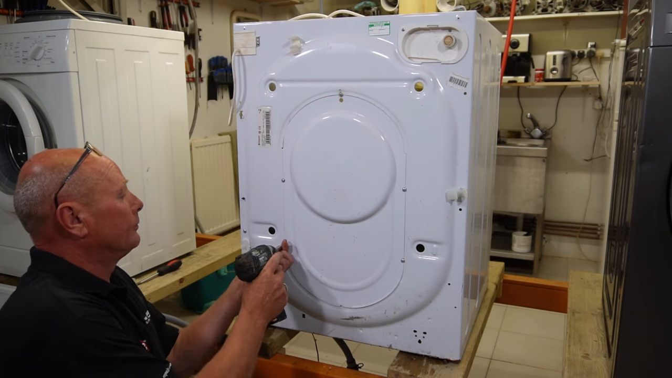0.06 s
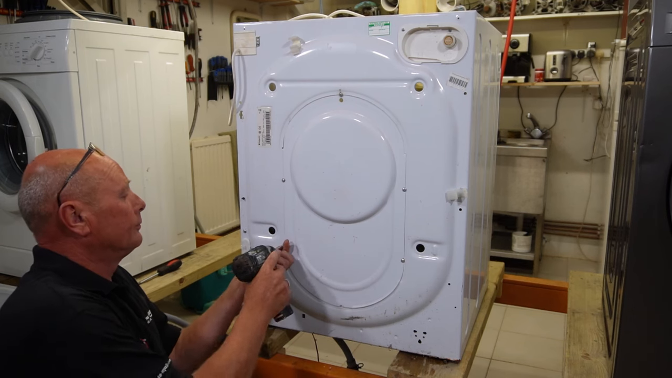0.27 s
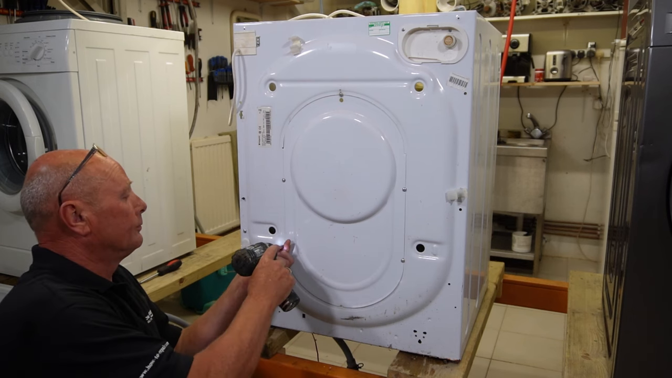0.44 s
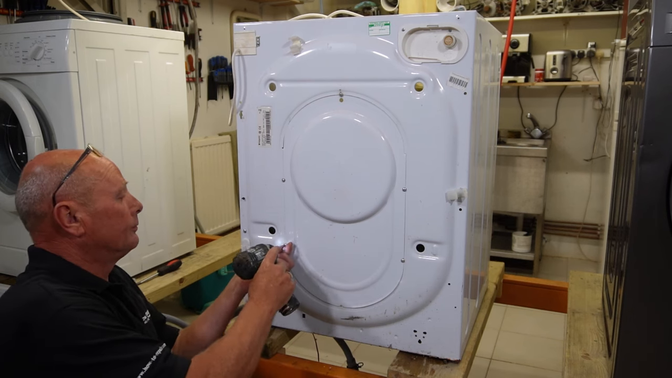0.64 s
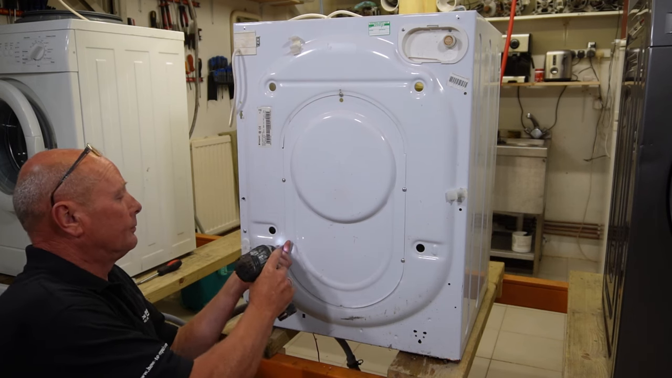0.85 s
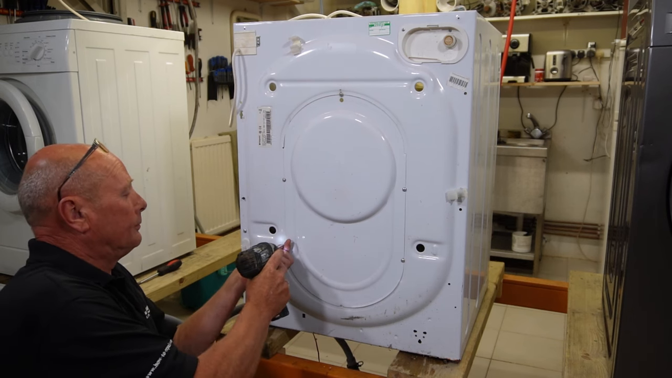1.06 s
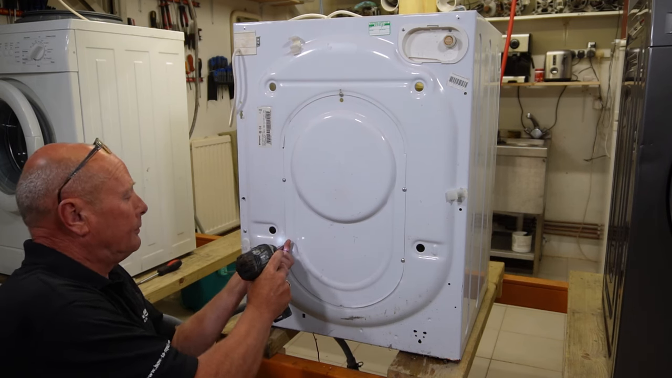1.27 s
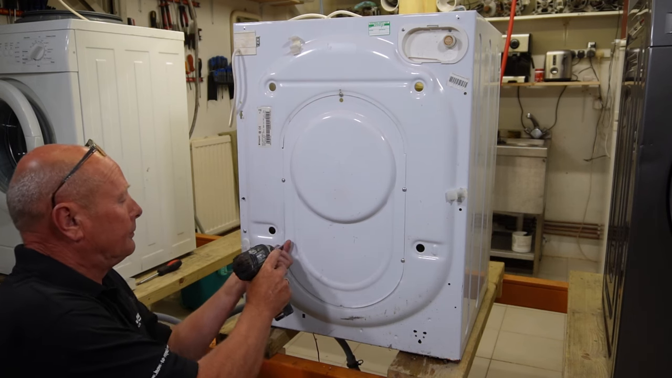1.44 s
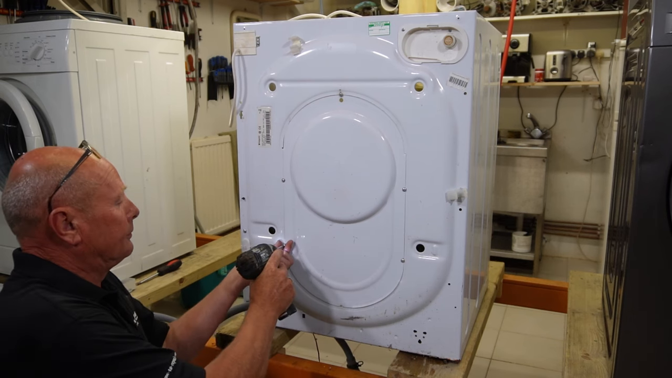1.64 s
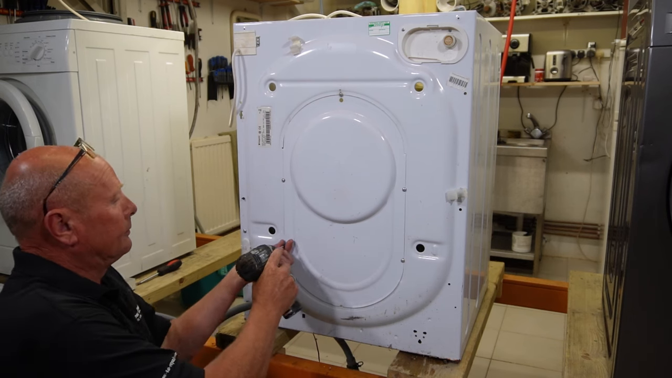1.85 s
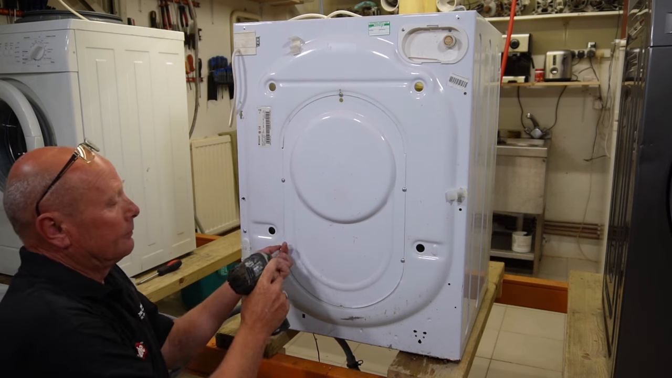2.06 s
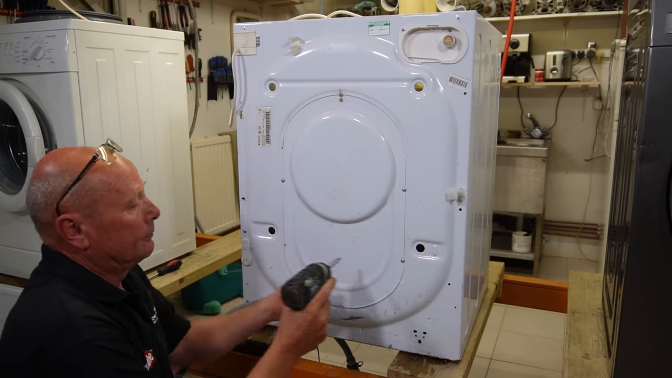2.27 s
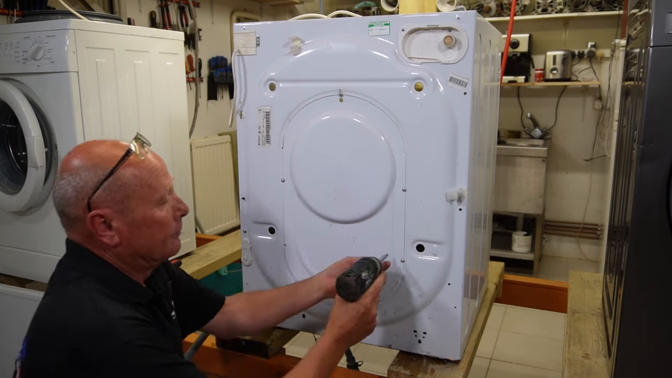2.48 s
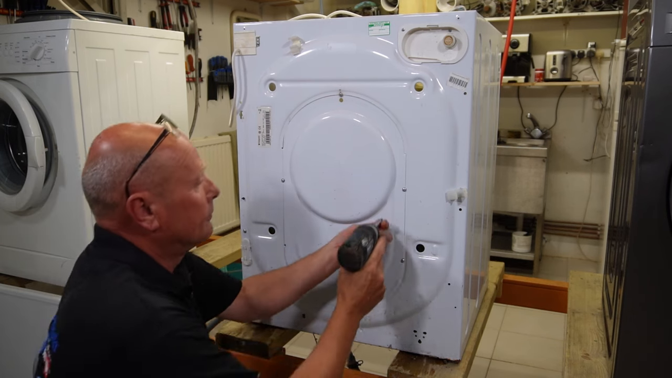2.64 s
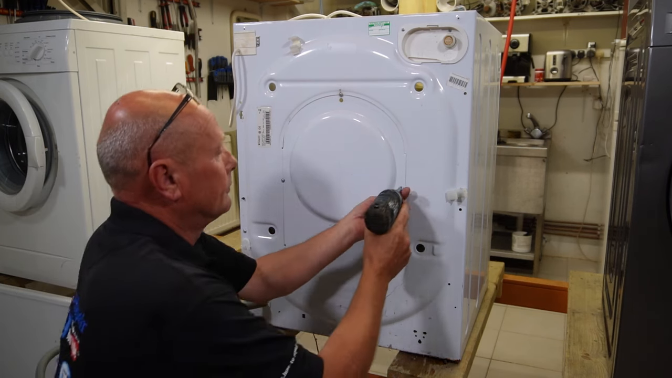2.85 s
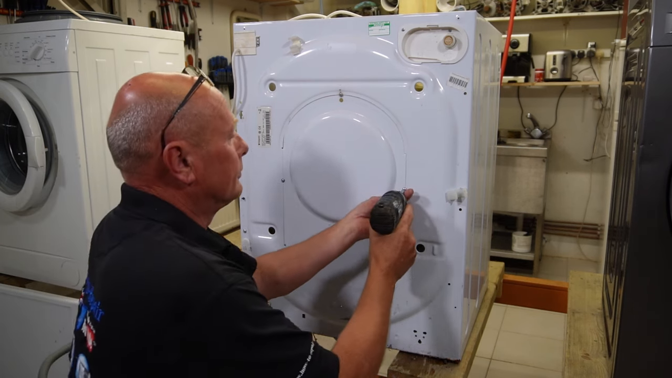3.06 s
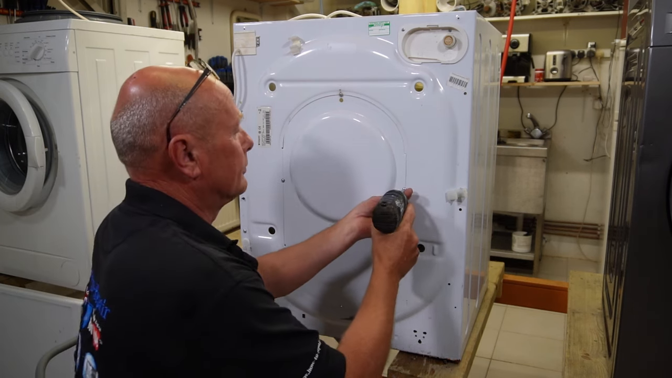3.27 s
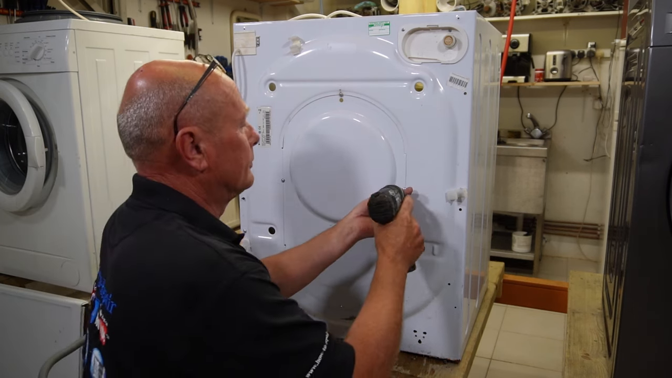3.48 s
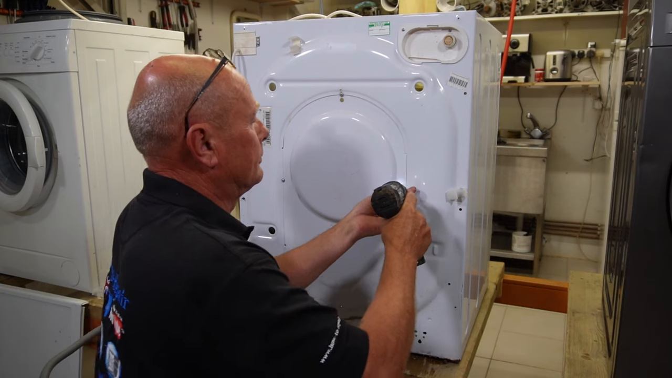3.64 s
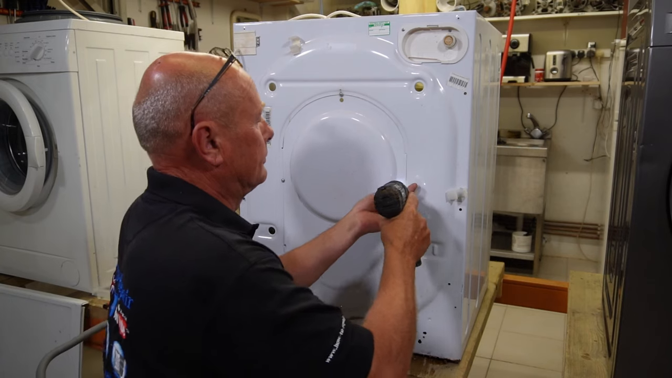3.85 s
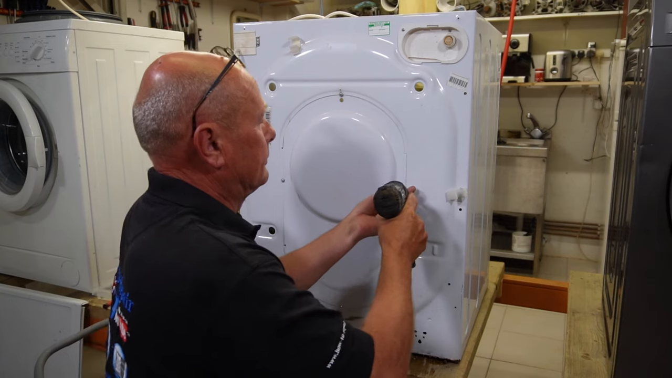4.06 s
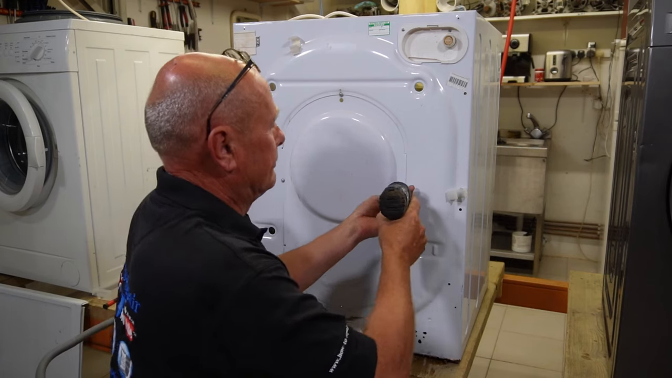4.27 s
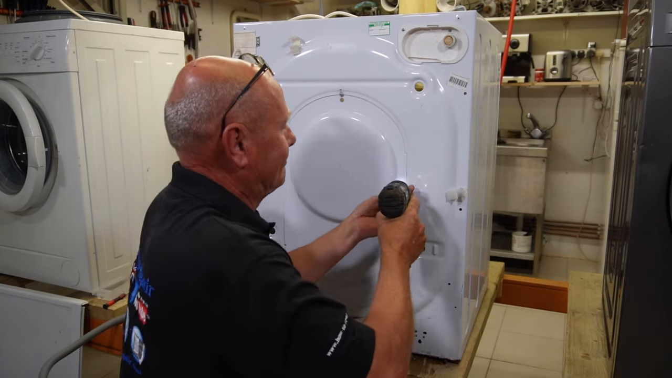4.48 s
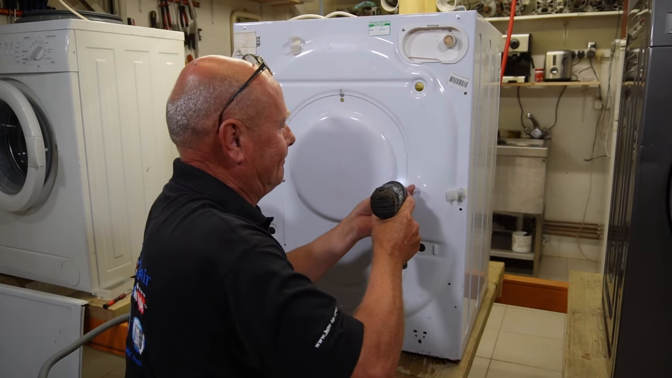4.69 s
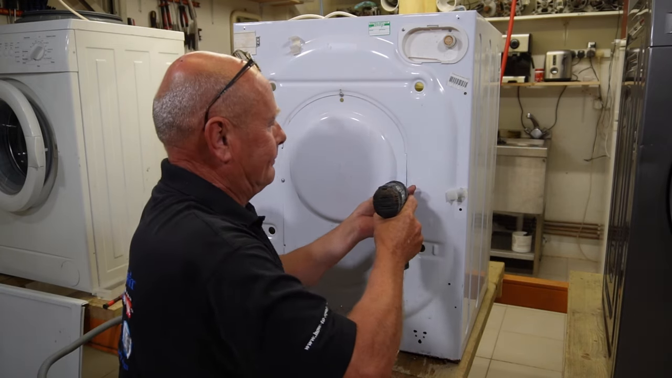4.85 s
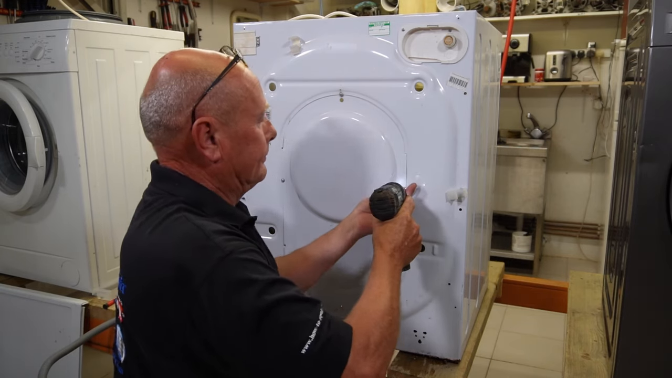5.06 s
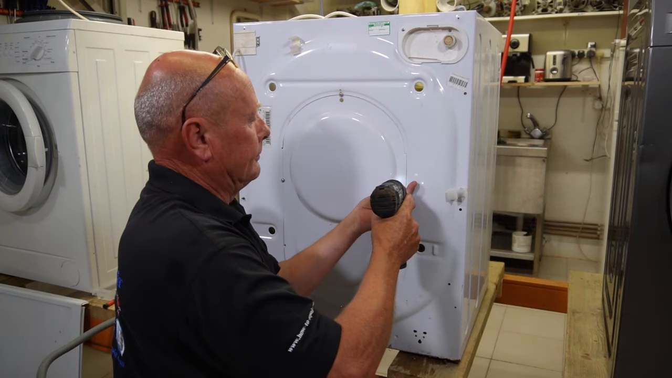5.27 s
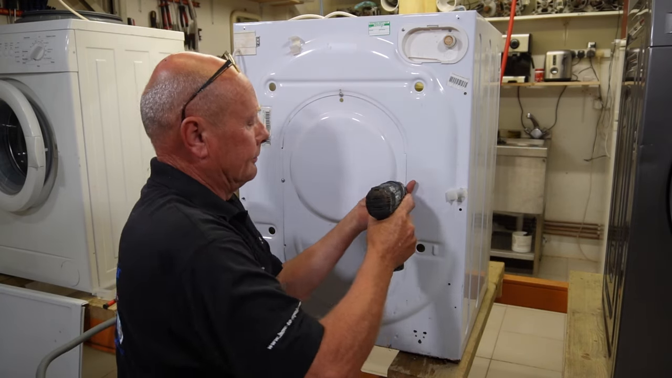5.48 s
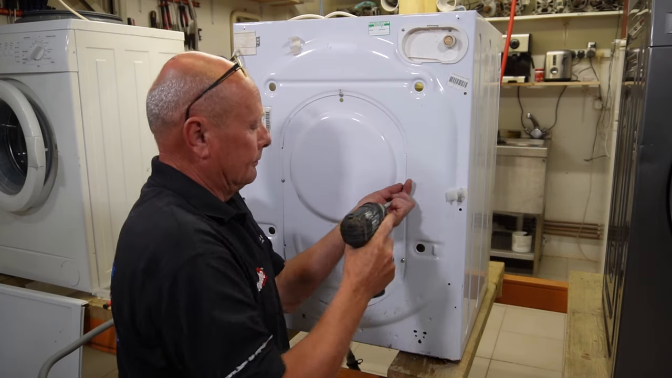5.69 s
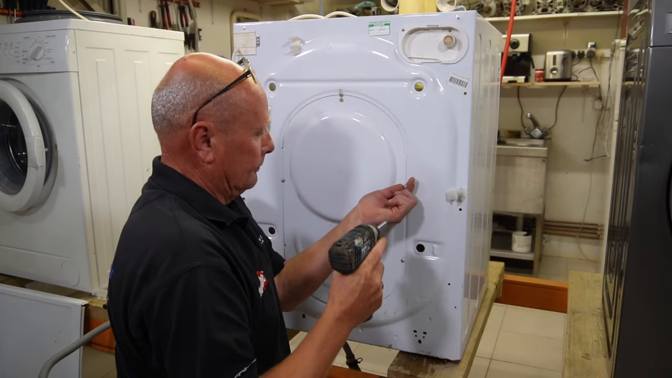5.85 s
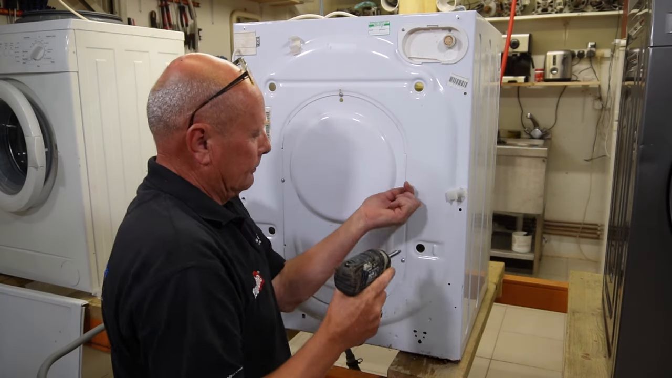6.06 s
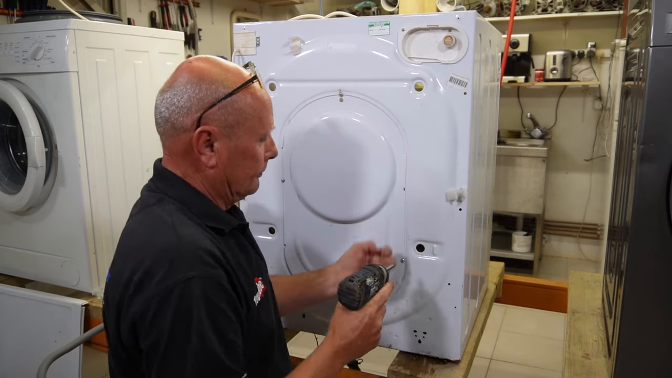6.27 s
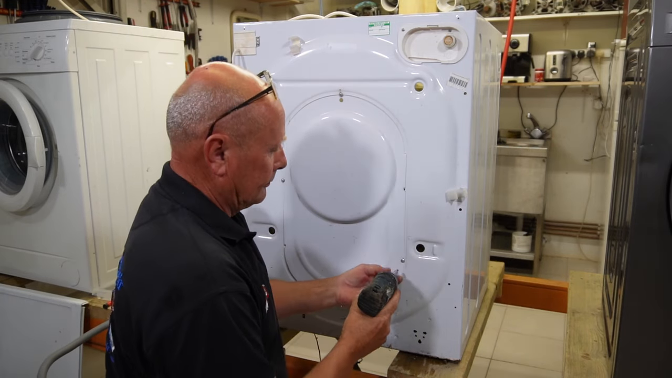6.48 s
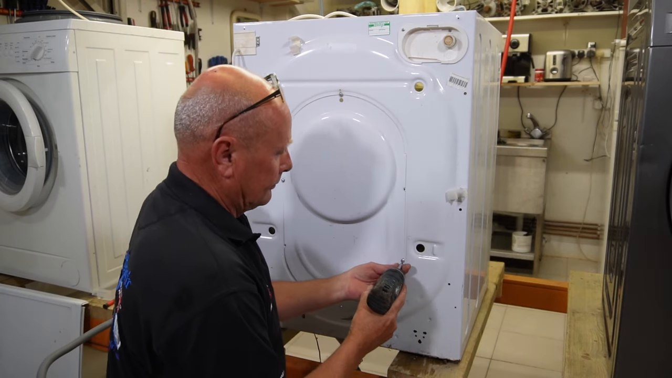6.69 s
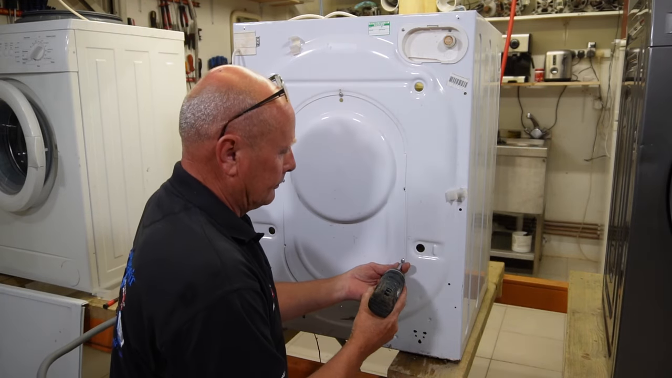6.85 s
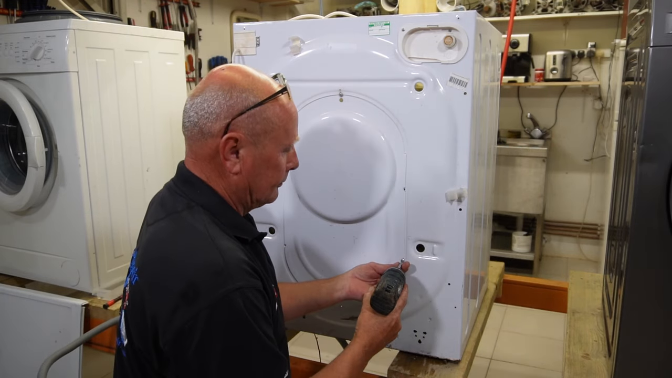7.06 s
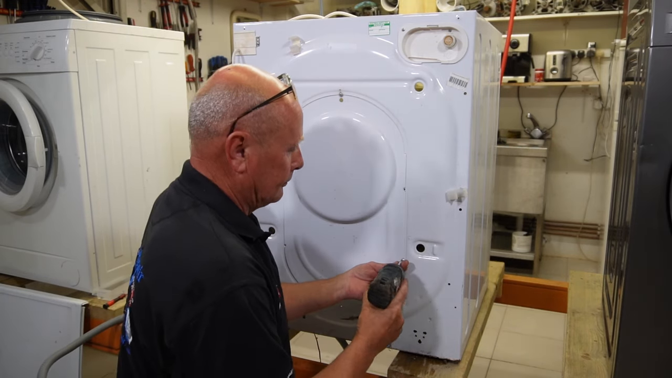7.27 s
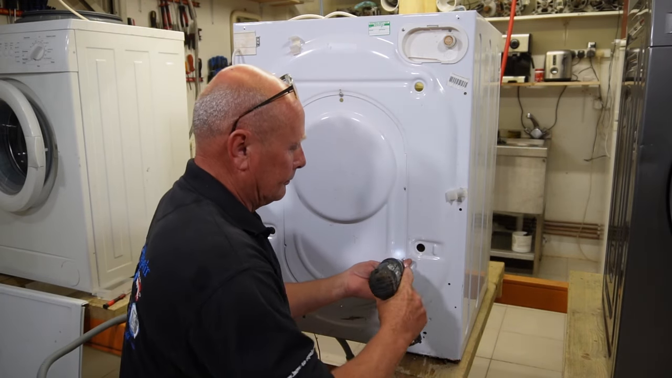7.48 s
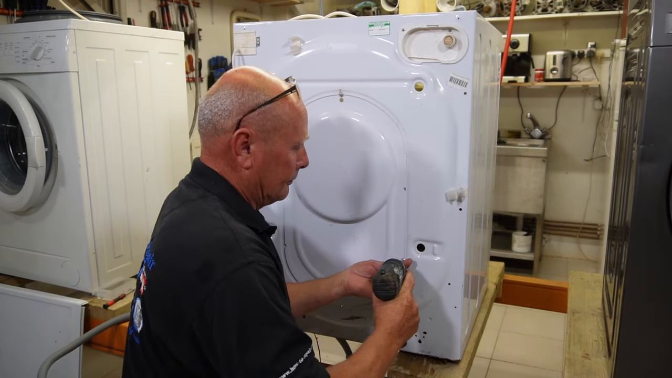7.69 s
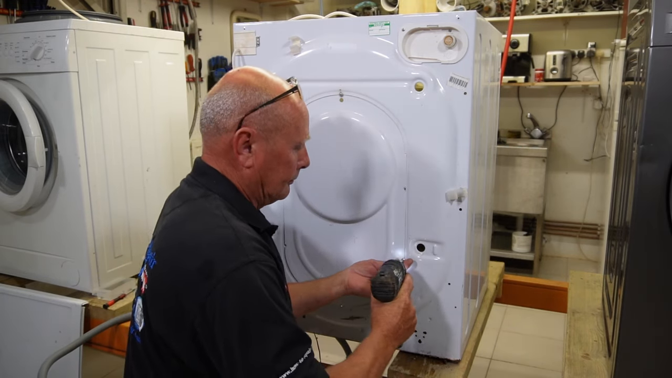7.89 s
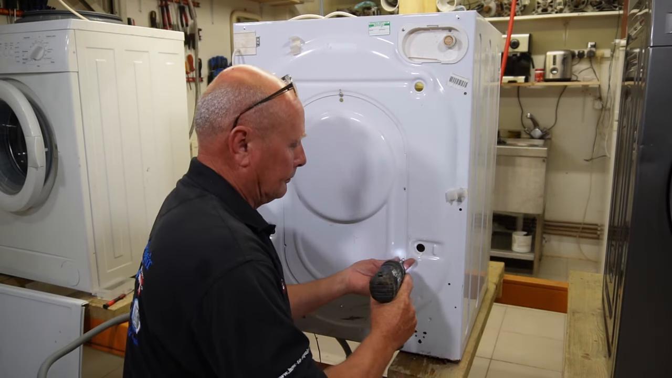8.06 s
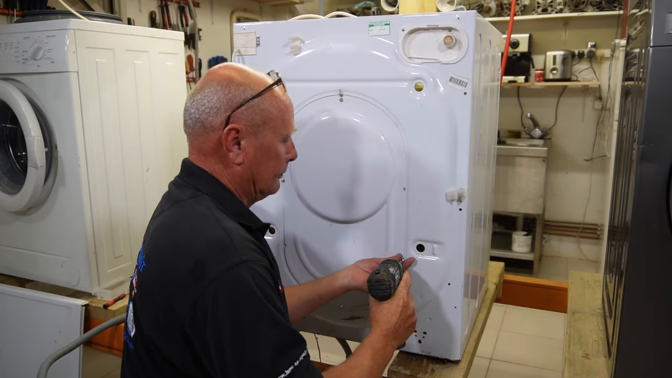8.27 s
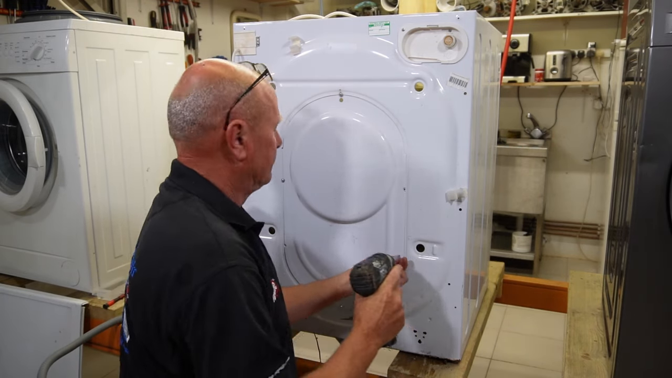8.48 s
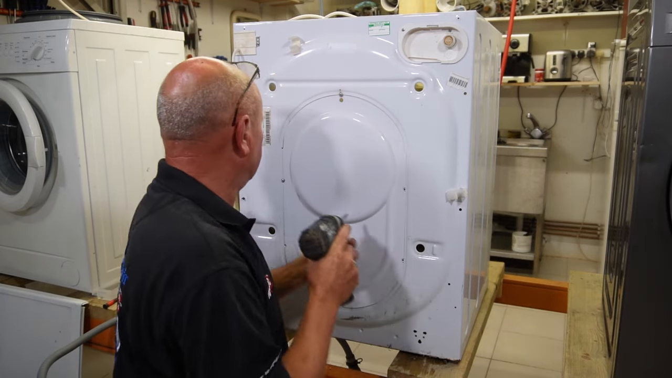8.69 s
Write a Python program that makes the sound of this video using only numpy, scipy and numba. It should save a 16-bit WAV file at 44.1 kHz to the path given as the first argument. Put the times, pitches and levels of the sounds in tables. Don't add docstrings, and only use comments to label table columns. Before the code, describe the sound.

Faint, low workshop air sits under everything. Light panel knocks open the scene, with a strong hollow thud at 0.45 s, then a loud rattling drill-driver burst from 0.5 to 0.8. Shorter, higher grinding whirs follow at 1.1-1.5, with a thin momentary squeal near 1.2, and a quick blip at 1.7. A double knock comes at 2.0; soft rubbing and small ticks lead to clustered hollow bumps from 2.9 to 3.5. The driver chatters again at 3.7-4.15, drumming the sheet, then at 4.6-4.85 with a heavy bang, and at 5.1-5.4. From 5.65 to 7.3 there is only handling: dull knocks, skin on paint, loose screws clicking. A big ringing thump at 7.4 precedes a low growling pull from 7.6, bursting higher at 7.9-8.2 with catches and clanks. A last knock at 8.45 rings away, with tiny ticks.

```python
import sys
import numpy as np
from scipy import signal
from scipy.fft import rfft, irfft
from scipy.io import wavfile
from scipy.ndimage import uniform_filter1d, minimum_filter1d
from numba import njit

SR = 44100
rng = np.random.default_rng(int(sys.argv[2]) if len(sys.argv) > 2 else 0)


def store_wav(level_fs):
    pcm = np.round(np.clip(np.atleast_2d(level_fs), -1, 1) * 32767)
    wavfile.write(sys.argv[1], SR, pcm.T.astype(np.int16))


def voltage_ratio(decibels):
    exponent = np.asarray(decibels, float) / 20
    return 10 ** exponent


N = 384993
TEETH = 16

# (trigger [s], bit bites [s], let go [s], grind [dB], rattle minus grind [dB])
TRIGGER_PULLS = [(0.49, 0.528, 0.78, -7, 3), (1.119, 1.177, 1.347, -12.5, -2),
                 (1.403, 1.412, 1.477, -12, -2.5), (1.66, 1.674, 1.732, -23.5, -12),
                 (3.7, 3.781, 4.07, -13, 4.5), (4.072, 4.075, 4.153, -18.5, 10),
                 (4.586, 4.625, 4.85, -13.5, -4), (5.113, 5.206, 5.378, -11, -0.5),
                 (7.594, 7.607, 8.3, -11, 5.5), (7.651, 7.654, 7.77, -25.5, -6),
                 (7.88, 7.915, 8.052, -15, -8.5), (8.054, 8.048, 8.224, -13, 0)]
# (frequency [Hz], level [dB])
GRIND_TONE = [(410, -41), (700, -2.5), (825, -6), (1430, -0.5), (1670, 0), (2930, -1.5), (3850, -6),
              (4500, -24.5), (5500, -24), (7150, -39.5), (12100, -120)]
# (frequency [Hz], level [dB])
HISS_TONE = [(2350, -37.5), (4000, -1.5), (4650, -2.5), (7570, -6), (9060, -11), (12700, -14), (15000, -22),
             (16000, -31)]
# (frequency [Hz], level [dB])
THUD_TONE = [(15, -37), (25, -34), (107, -12), (162, -4.5), (226, -2), (346, 4.5), (446, 0), (514, 1),
             (684, -6), (1100, -14), (1430, -9.5), (2420, -120)]


def level(x, db=0):
    return x * voltage_ratio(db) / np.sqrt(np.mean(x ** 2))


def colour(x, points):
    hz, db = np.transpose(points)
    bins_hz = np.arange(2049) * SR / 4096
    log_gain = np.interp(np.log(bins_hz + 1), np.log(hz), db) * np.log(10) / 20
    cepstrum = irfft(log_gain)
    cepstrum[1:2048] *= 2
    cepstrum[2049:] = 0
    taps = irfft(np.exp(rfft(cepstrum)))
    taps = taps / np.sqrt(np.sum(taps ** 2))
    return signal.fftconvolve(x, taps)[:len(x)]


def walk(rate):
    k = int(SR / rate)
    steps = np.repeat(rng.standard_normal(N // k + 1), k)
    return uniform_filter1d(uniform_filter1d(steps, k), k)[:N]


def holds(start, end, db, rise_db_s, fall_db_s):
    t = np.arange(N) / SR
    start, end, db = (np.reshape(v, (-1, 1)) for v in (start, end, db))
    rise = rise_db_s * np.clip(start - t, 0, None)
    fall = fall_db_s * np.clip(t - end, 0, None)
    return db - rise - fall


def strikes(times, db):
    out = np.zeros(N)
    out[(times * SR).astype(int)] = voltage_ratio(db)
    return out


def bursts(times, db, decay, size=1500):
    out, t = np.zeros(N + size), np.arange(size) / SR
    noise = rng.standard_normal((len(times), size)) * np.exp(-t / decay)
    noise /= np.sqrt(np.sum(noise ** 2, axis=1, keepdims=True))
    for s, gain, row in zip(times, voltage_ratio(db), noise):
        start = int(s * SR)
        out[start:start + size] += gain * row
    return out[:N]


def rings(times, db, hz, shape, sag=0):
    out, t = np.zeros(N + len(shape)), np.arange(len(shape)) / SR
    for s, gain, f in zip(times, voltage_ratio(db), hz):
        start = int(s * SR)
        out[start:start + len(t)] += gain * np.sin(2 * np.pi * f * (t - sag * t ** 2)) * shape
    return out[:N]


def room_tone():
    # (frequency [Hz], level [dB])
    room_air = [(15, -46), (25, 0.5), (285, 2), (754, -9), (1130, -7), (1290, -7), (3720, -17), (4490, -21),
                (14400, -28.5), (16000, -28)]
    air = colour(rng.standard_normal(N), room_air)
    return level(air * voltage_ratio(2.0 * walk(1.5)), -52.5)


def knocks(lag=.003):
    # (time [s], thud [dB], clank minus thud [dB], crack minus thud [dB])
    resting = [(0.001, -22, -16, -37), (0.196, -12.5, -6, -22), (0.445, 1, -4.5, -25), (1.11, -17, -7, -12),
               (1.955, -41, 10.5, -1), (1.999, -22, -6.5, -18), (2.006, -14, -5.5, -15.5),
               (2.495, -39.5, -15, -31), (2.733, -41.5, -18, -42), (2.774, -29.5, -9.5, -40),
               (2.885, -28.5, -8, -38), (2.918, -17.5, -38, -29.5), (2.988, -16.5, -4, -30),
               (3.035, -24, -1.5, -24), (3.054, -31, -8, -28), (3.085, -26, -2, -25),
               (3.167, -18, -17, -51), (3.306, -14.5, -13.5, -46), (3.316, -11.5, -14, -41),
               (3.343, -12.5, -21, -50), (3.438, -26, -19, -45), (3.504, -9.5, -25, -49),
               (3.653, -34.5, 7.5, -3), (5.89, -16, -15, -23.5), (5.911, -17, -17, -45),
               (5.94, -16.5, -21, -31), (5.97, -25.5, -9.5, -35), (6.027, -34, -26, -17),
               (6.68, -43, 9, -6), (6.685, -26, -1, -11), (6.69, -17.5, -7.5, -15.5), (6.771, -33, 3, -25),
               (6.78, -33, -3, -28), (6.789, -25.5, 0.5, -16), (6.949, -18.5, -4.5, -25),
               (7.039, -21.5, -8.5, -25), (7.164, -28.5, -15, -29), (7.192, -14, -7, -28.5),
               (7.414, 3.5, -8.5, -17), (8.45, -11.5, -6, -12.5)]
    # (time [s], thud [dB], clank minus thud [dB], crack minus thud [dB])
    turning = [(0.53, -12, 14, 7.5), (0.584, -8, 0, -5), (1.195, -7, -2, -4.5), (1.405, -2.5, -4.5, -16),
               (1.486, -15.5, 5.5, -7.5), (1.727, -8, -10.5, -39), (1.738, -22.5, -2, -29),
               (1.763, -21, -5, -35), (1.775, -25.5, -16, -36), (1.788, -31, -18.5, -45),
               (3.731, -34, -5, -33), (3.753, -19, 0.5, -28), (3.767, -3.5, -7, -23), (3.783, -25, -7, -19),
               (3.796, -9.5, 4.5, -3), (3.81, -16, -2.5, -12), (3.826, -2, -11, -17),
               (4.618, -1.5, -22.5, -46), (4.649, 8, -11.5, -20), (4.675, -2, -14, -20),
               (4.688, -4.5, 3, -1.5), (5.205, -9, 13.5, -7.5), (7.593, -4.5, 3, -3.5),
               (7.621, -24, -12, -8), (7.646, -5, 5.5, -1), (7.687, -10, 3.5, -5.5),
               (7.903, -25.5, 6.5, -9), (8.054, -3, -4.5, -32), (8.075, -11, 8.5, -0.5),
               (8.148, -11.5, 8, -4.5), (8.181, -0.5, -18, -21)]
    s, db, clank_db, crack_db = np.transpose(np.concatenate([resting, turning]))
    late = s + lag
    clank_db, crack_db = db + clank_db, db + crack_db
    thud = colour(strikes(s + 0.00088, db + 20.5), THUD_TONE)
    clank = strikes(late, clank_db + 14.5) + bursts(late, clank_db + 23.0, 0.0044)
    crack = strikes(late, crack_db + 22.0) + bursts(late, crack_db + 14.5, 0.0022)
    return colour(clank, GRIND_TONE) + colour(crack, HISS_TONE), thud


def panel_modes(split=0.0259, twin_db=-3.5):
    # (frequency [Hz], level [dB], time to fall 60 dB [s])
    bending = [(80, -23, 0.74), (103, -5, 1.8), (149.4, -3.5, 1.4), (221, -11.5, 0.31), (250, -5.5, 1.13),
               (290, -2.5, 1.18), (321, -7.5, 0.62), (381.6, -3, 0.73), (442, -2, 0.82), (505, 4.5, 0.37),
               (562.4, -1, 0.83), (611.6, -1, 0.95), (706, -15.5, 1.9), (820, -12.5, 1.67), (900, -20, 1.7),
               (1260, -11.5, 1.1), (1570, -17.5, 0.88), (2580, -15, 0.47)]
    t, out = np.arange(SR) / SR, 0
    apart = 1 + split * rng.uniform(-1.01, 1, len(bending))
    for (hz, db, t60), k in zip(bending, apart):
        pair = np.sin(2 * np.pi * hz * t) + voltage_ratio(twin_db) * np.sin(2 * np.pi * hz * k * t)
        out = out + voltage_ratio(db) * pair * np.exp(-np.log(1000) * t / t60)
    return level(out) / np.sqrt(SR)


def diffuse_ring(build=0.00019, early_db=6.5, early_share=0.31):
    # (frequency [Hz], time to fall 60 dB [s])
    fading = [(60, 1), (160, 0.96), (420, 0.99), (1100, 0.68), (2900, 0.49), (6000, 0.42), (14000, 0.34)]
    t, hz = np.arange(SR) / SR, np.arange(SR // 2 + 1) + 1.
    fade_hz, fade_s = np.transpose(fading)
    spectrum, out = rfft(rng.standard_normal(SR)), 0
    for centre in 30 * 2 ** np.arange(0, 9.3, .5):
        share = np.clip(1 - 2 * np.abs(np.log2(hz / centre)), 0, 1)
        t60 = np.interp(np.log(centre), np.log(fade_hz), fade_s)
        tail = np.exp(-np.log(1000) * t / t60)
        early = voltage_ratio(early_db) * tail ** (1 / early_share)
        out = out + irfft(spectrum * share, SR) * (tail + early) / np.sqrt(t60)
    return level(out * (1 - np.exp(-t / build))) / np.sqrt(SR)


def notes(t60=0.39, sag=0.1):
    # (time [s], level [dB], frequency [Hz])
    sung = [(0.197, -16, 533), (2.007, -24, 256.4), (2.92, -16, 498), (2.988, -18.5, 517.5),
            (3.169, -28, 370), (3.306, -7, 360.2), (3.504, -13.5, 232), (4.9, -22, 2640), (5.0, -35, 2490),
            (5.07, -32, 2400), (8.291, -17, 1620), (5.892, -15.5, 228.2), (5.895, -24, 1260),
            (6.951, -26, 369), (7.195, -14, 375), (7.413, 2.5, 367), (8.055, 1.5, 500.2),
            (8.452, -14, 368.5)]
    s, db, hz = np.transpose(sung)
    t = np.arange(SR) / SR
    shape = np.exp(-np.log(1000) * t / t60) * (1 - np.exp(-t / 0.0006))
    return rings(s, db - 7.5, hz, shape, sag) * voltage_ratio(5.5 * walk(70))


def ticks(ring_s=0.0011):
    # (time [s], level [dB], centre frequency [Hz], top minus level [dB])
    small_parts = [(0.3544, -26, 1530, -29), (0.3628, -21, 3120, -14), (1.0246, -20.5, 3280, -14),
                   (1.085, -18.5, 1275, -19), (2.199, -40, 2000, -24), (2.38, -37.5, 1190, -28),
                   (2.471, -45, 1280, -16), (2.557, -28, 1170, -21), (3.54, -18, 970, -18),
                   (3.6215, -39, 1111, -15), (4.45, -31, 2480, -14), (4.4578, -22, 3345, -12.5),
                   (4.5367, -27, 3700, -3), (4.578, -21, 1250, -28), (4.594, -34, 3260, -25),
                   (5.022, -18, 3430, -17), (5.156, -17.5, 1260, -33), (5.67, -29, 2200, -21),
                   (5.8144, -36.5, 1260, -32), (6.106, -41, 980, -6), (6.143, -38, 1050, -10),
                   (6.17, -30, 3620, -3), (6.188, -34, 2090, -29), (6.3758, -39.5, 2370, -0.5),
                   (6.4632, -40, 1300, -4), (6.547, -27, 1300, -20), (6.55, -24, 1290, -21),
                   (6.587, -34, 2180, -18), (6.621, -23, 1222, -17), (7.3323, -32, 1260, -13),
                   (8.6171, -33, 1060, -24)]
    s, db, hz, top_db = np.transpose(small_parts)
    t = np.arange(800) / SR
    ring = rings(s, db + 5.5, hz, np.exp(-t / ring_s) * (1 - np.exp(-t / 0.00045)))
    body = colour(bursts(s, db + 12.0, 0.004), GRIND_TONE)
    crack = colour(bursts(s, db + top_db + 15.5, 0.0057), HISS_TONE)
    return ring + body + crack


def rub():
    # (from [s], to [s], body [dB], hiss [dB])
    slides = [(0.36, 0.45, -27, -45), (2.176, 2.7, -64.5, -64), (2.716, 2.777, -42, -69),
              (2.784, 3.004, -36.5, -58), (3.035, 3.087, -24.5, -49), (3.324, 3.372, -35, -59),
              (3.41, 3.506, -48, -41.5), (3.612, 3.686, -33, -49), (4.462, 4.58, -26.5, -52),
              (5.652, 5.804, -45, -71), (5.91, 5.982, -28.5, -52), (6.2, 6.506, -60, -58),
              (6.572, 6.66, -35.5, -66), (6.71, 6.78, -24, -59), (6.85, 7.356, -34, -69)]
    start, end, body_db, airy_db = np.transpose(slides)
    rise_db_s, fall_db_s = 302, 130
    db = holds(start, end, body_db, rise_db_s, fall_db_s).max(axis=0)
    hiss_db = holds(start, end, airy_db, rise_db_s, fall_db_s).max(axis=0)
    jerks_db = 3. * rng.exponential(size=N) + 4. * walk(25)
    slips = level(rng.standard_normal(N) * voltage_ratio(jerks_db))
    body = colour(slips, THUD_TONE) + voltage_ratio(-5.0) * colour(slips, GRIND_TONE)
    hiss = colour(rng.standard_normal(N), HISS_TONE)
    return voltage_ratio(db - 10.5) * body + voltage_ratio(hiss_db - 10.0) * hiss


def motor():
    # (starts [s], run-up [s], top tooth rate [Hz], power off [s])
    runs = [(0.4, .18, 1153, .82), (1.1, 0.31, 1975, 1.5), (1.1, 0.31, 1975, 1.44),
            (1.645, .09, 1950, 1.74), (3.67, .2, 1778, 4.16), (3.67, .2, 1780, 4.15),
            (4.52, .34, 1880, 4.855), (5.08, .2, 1800, 5.36), (7.5, .1, 783, 7.65),
            (7.635, 0.07, 1400, 7.72), (7.89, .2, 1930, 8.16), (7.89, .2, 1930, 8.06)]
    creep, coast_s = .1, .26
    t = np.arange(N) / SR
    pull = np.searchsorted(np.array(TRIGGER_PULLS)[:, 0], t + .01) - 1
    pull = np.clip(pull, 0, None)
    start, run_up, top_hz, off = np.array(runs)[pull].T
    share = np.sin(np.pi / 2 * np.clip((t - start) / run_up, creep, 1))
    coast = np.exp(-np.clip(t - off, 0, None) / coast_s)
    return pull, top_hz * share * coast


def drill(edge=0.013):
    brush_db = [-10.5, -11, -15.5, -13, -8.5, -13, -11.5, -16, -10, -9, -10, -18.5]
    # (frequency [Hz], level [dB])
    drum_tone = [(130, -30), (200, -3), (270, 0), (330, -2), (430, -20), (800, -90)]
    drum_db = [-2, -12, -12, -12, -4, -2, -5, -16, -8, -8, -14, -2]
    free_db, free_rattle_db, free_hiss_db = -3.5, -11, -8.5
    squeeze_db_s, sag_db_s = 200, 7.5
    stop_db_s, rattle_stop_db_s = 266, 105
    blow = 13.2

    t = np.arange(N) / SR
    pull, hz = motor()
    trigger, bite, stop, load_db, shake_db = np.array(TRIGGER_PULLS)[pull].T
    on = np.clip((t - trigger + edge) / (edge + 0.12 * np.abs(bite - trigger)), 0, 1)
    free = t < bite
    after = np.clip(t - stop, 0, None)
    held_db = load_db + free_db * free + 1.2 * walk(30)
    held_db = held_db - squeeze_db_s * np.clip(bite - t, 0, None) - sag_db_s * np.clip(t - bite, 0, None)
    grind_db = held_db - stop_db_s * after
    rattle_db = held_db + shake_db + free_rattle_db * free - rattle_stop_db_s * after + 2. * walk(25)
    hiss_db = np.array(brush_db)[pull] + free_hiss_db * free + 1.0 * walk(30)

    turns = np.cumsum(hz) / SR / TEETH
    blows = np.flatnonzero(np.diff(np.floor(turns + .05 * walk(120))) > 0)
    train = np.zeros(N)
    train[blows] = voltage_ratio(2. * rng.standard_normal(len(blows))) * blow
    shake = train + 0.55 * rng.standard_normal(N)
    drumming = voltage_ratio(np.array(drum_db)[pull]) * colour(shake, drum_tone)
    rattle = colour(shake, THUD_TONE) + drumming

    beat = voltage_ratio(5.44 * np.cos(2 * np.pi * turns) + 0.77 * walk(50))
    chatter = level(rng.standard_normal(N) * voltage_ratio(3.48 * rng.exponential(size=N)))
    grit = chatter + train * voltage_ratio(-8.)
    air = colour(grit, GRIND_TONE) + colour(grit, HISS_TONE) * voltage_ratio(hiss_db - 0.5)
    return on * voltage_ratio(grind_db - 6.5) * beat * air, on * voltage_ratio(rattle_db - 2.0) * rattle


def boom():
    # (from [s], to [s], frequency [Hz], level [dB])
    walls = [(0.6, 0.812, 116.6, -23.5), (3.317, 3.37, 108, -33), (3.522, 3.54, 110.3, -27),
             (3.608, 3.697, 98.4, -37.5), (3.855, 4.009, 110.4, -17.5), (4.01, 4.44, 80, -30.5),
             (4.024, 4.296, 142, -24), (4.46, 4.538, 98, -34), (5.348, 5.424, 112.3, -27),
             (5.356, 5.43, 66.5, -33), (6.567, 6.613, 97.4, -41), (6.56, 6.617, 160, -42),
             (6.963, 7.05, 104, -45), (7.207, 7.232, 106, -34), (8.148, 8.221, 105, -22)]
    start, end, wall_hz, wall_db = np.transpose(walls)
    rows = holds(start, end, wall_db, rise_db_s=393, fall_db_s=161)
    sway = 2 * np.pi * np.cumsum(1 + 0.0875 * walk(30)) / SR
    tones = sum(voltage_ratio(db) * np.sin(hz * sway) for db, hz in zip(rows, wall_hz))
    return voltage_ratio(1.7 * walk(27) - 1.5) * tones


def chinks(ring_s=0.00091):
    # (time [s], level [dB], ring frequency [Hz])
    loose_screws = [(1.018, -34, 3010), (2.363, -43, 2800), (2.712, -44, 900), (4.41, -37, 3220),
                    (4.466, -32, 5430), (4.5, -37, 2800), (5.637, -42, 5600), (5.66, -42, 6450),
                    (6.156, -43.5, 3980), (6.34, -45, 5000), (6.385, -39, 2600), (6.47, -46.5, 6200),
                    (6.612, -44, 6270), (6.652, -46, 7000), (6.797, -39, 3000), (8.58, -43, 4400),
                    (8.676, -40, 5500)]
    s, db, hz = np.transpose(loose_screws)
    ring = rings(s, db, hz, np.exp(-np.arange(800) / SR / ring_s))
    return ring + colour(bursts(s, db + 1.0, 0.003), HISS_TONE)


def whine():
    # (from [s], to [s], second multiple [dB], tilt per higher multiple [dB])
    clear_runs = [(1.19, 1.215, -26, -4), (1.23, 1.36, -20, -12), (1.37, 1.48, -24, -12),
                  (1.683, 1.69, -24, -20), (1.712, 1.72, -36, -20), (4.77, 4.8, -25, -12),
                  (4.81, 4.855, -20.5, -16), (4.87, 4.96, -30, -20), (5.17, 5.195, -35, -9),
                  (7.6, 7.65, -21, -9), (7.675, 7.71, -18, -18), (7.925, 7.96, -25, -3),
                  (7.972, 7.992, -14, -7), (8.0, 8.055, -19, -6), (8.07, 8.09, -21, -3)]
    # (frequency [Hz], level [dB])
    housing = [(1000, -9), (1600, -1), (2200, 0), (4200, 0), (6000, -3), (9000, -10)]
    start, end, clear_db, tilts = np.transpose(clear_runs)
    rows = holds(start, end, clear_db, rise_db_s=688, fall_db_s=688)
    db, tilt_db = rows.max(axis=0), tilts[rows.argmax(axis=0)]
    hz = motor()[1]
    turns = np.cumsum(hz * (1 + .024 * walk(300) + .012 * walk(60))) / SR
    shares = [40 * np.log10(hz / 1950)] + [tilt_db * k ** .8 for k in range(5)]
    out = 0
    for k, share in enumerate(shares):
        body_db = np.interp((k + 1) * hz, *np.transpose(housing))
        flutter_db = 4 * walk(140) + 2 * walk(500) + 4 * np.cos(2 * np.pi * turns / TEETH + k)
        out = out + voltage_ratio(share + body_db + flutter_db) * np.sin(2 * np.pi * (k + 1) * turns)
    return voltage_ratio(db + 2.0) * out


def squeal(edge=0.0063):
    # (time [s], frequency [Hz], level [dB])
    bearing = [
        (1.21, 13100, -62),
        (1.23, 12100, -22),
        (1.265, 11840, -23),
        (1.29, 11900, -34),
        (1.4, 11600, -63),
    ]
    t = np.arange(N) / SR
    s, hz, db = np.transpose(bearing)
    on = np.clip(np.minimum(t - s[0], s[-1] - t) / edge + 1, 0, 1)
    pitch_hz = np.interp(t, s, hz) * (1 + .025 * walk(300))
    gain = voltage_ratio(np.interp(t, s, db) + 6.0 * walk(150))
    return on * gain * np.sin(2 * np.pi * np.cumsum(pitch_hz) / SR)


def switching():
    # (from [s], to [s], level [dB])
    half_pressed = [
        (3.63, 3.76, -65),
        (4.53, 4.62, -63),
        (5.13, 5.2, -65),
    ]
    db = holds(*np.transpose(half_pressed), 600., 600.).max(axis=0)
    return voltage_ratio(db) * np.sin(2 * np.pi * 15450 * np.arange(N) / SR)


def scene():
    clank, thud = knocks()
    air, rattle = drill()
    sheet = rattle + thud + rub()
    steel = air + clank + squeal()
    small, gears = ticks() + chinks(), whine()
    push = sheet + voltage_ratio(-9.0) * thud + voltage_ratio(9.0) * steel
    modes = signal.fftconvolve(push, panel_modes())[:N]
    send = voltage_ratio(-1.5) * (sheet - 0.31 * rattle) + voltage_ratio(1.0) * steel + voltage_ratio(-10.5) * small + voltage_ratio(-36.0) * gears
    place = 2 * np.pi * np.arange(N) / SR * 3.0
    wet = 0
    for share in (np.cos(place), np.sin(place)):
        wet = wet + signal.fftconvolve(send * share, diffuse_ring())[:N]
    straight = voltage_ratio(-11.5) * sheet + voltage_ratio(-4.5) * rattle + voltage_ratio(-4.5) * steel + small + gears
    straight = straight + boom() + notes() + switching()
    return (straight + wet + voltage_ratio(-24.0) * modes + room_tone())[None]


@njit
def limiter(x, top, ratio, release):
    gain, held = np.empty(len(x)), 0.
    for i in range(len(x)):
        held = max(x[i], held * release)
        gain[i] = min(1., (top / (held + 1e-9)) ** (1 - 1 / ratio))
    return gain


def low_pass(x):
    return signal.sosfilt(signal.butter(12, 16660, fs=SR, output="sos"), x)


def record(dry):
    peak = -minimum_filter1d(-np.abs(dry[0]), size=89)
    release = np.exp(-1 / (0.053 * SR))
    gain = uniform_filter1d(limiter(peak, 0.84, 29.0, release), size=45)
    treble_edge = signal.ellip(8, .2, 45, 15800, fs=SR, output="sos")
    mix = signal.sosfilt(treble_edge, dry * gain)
    return low_pass(mix)


dry = scene()
out = record(dry)
store_wav(out)
```